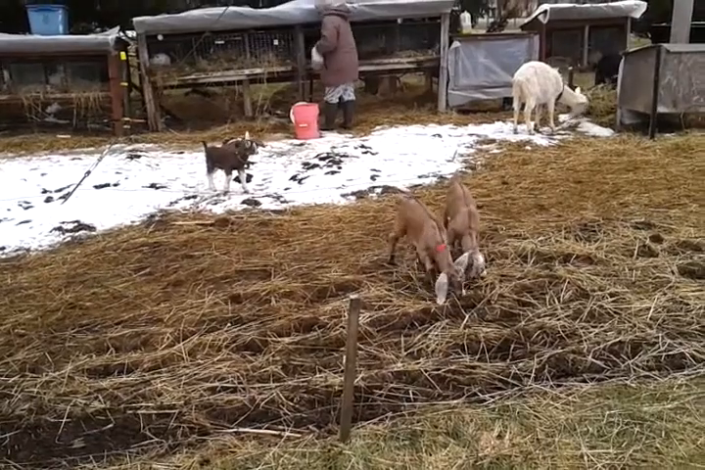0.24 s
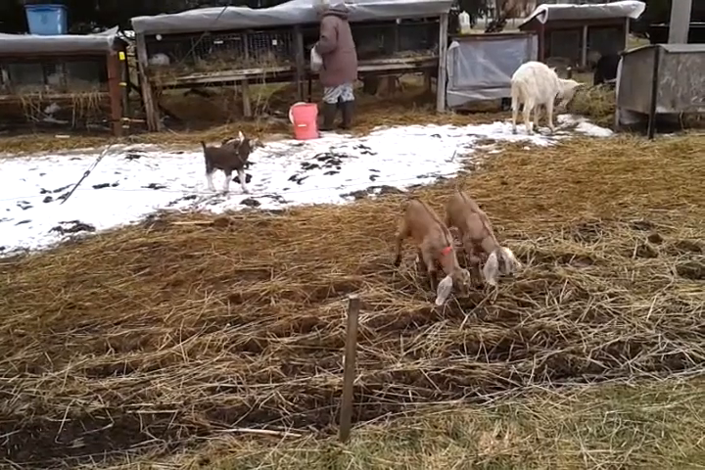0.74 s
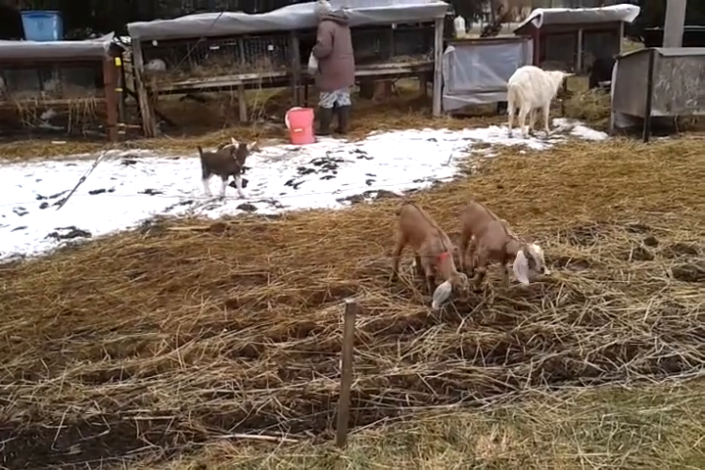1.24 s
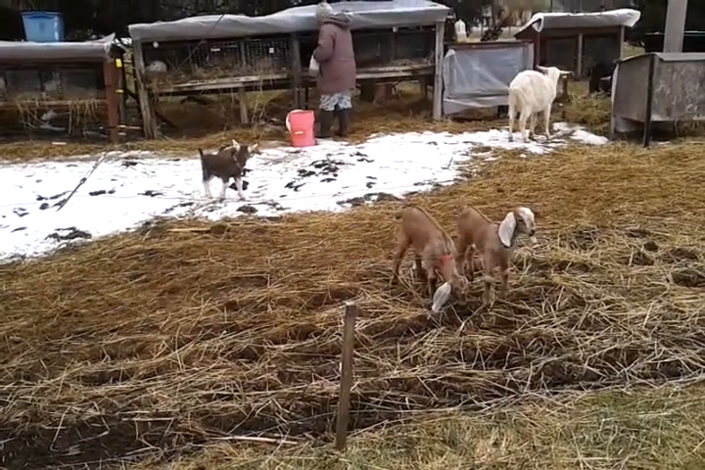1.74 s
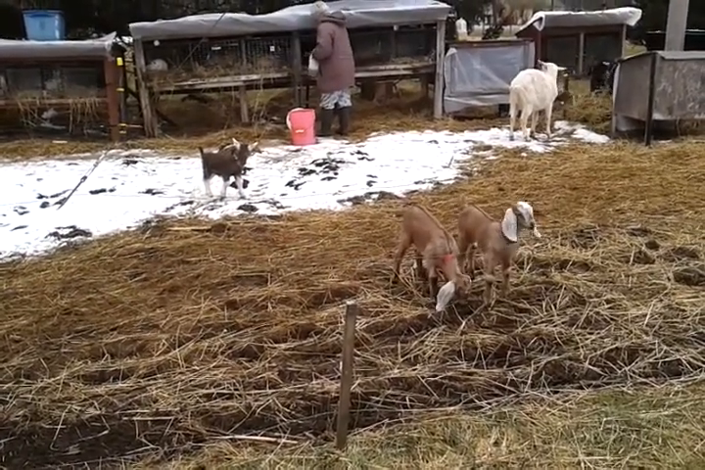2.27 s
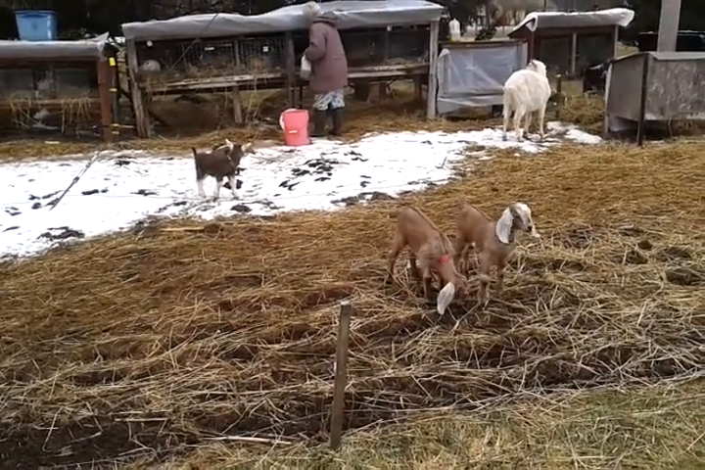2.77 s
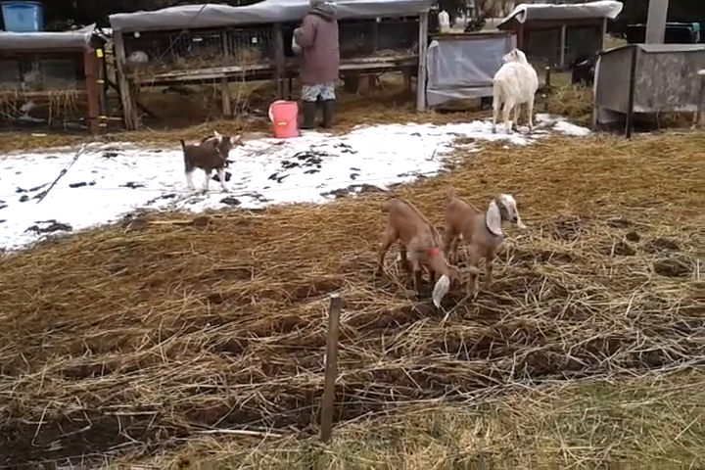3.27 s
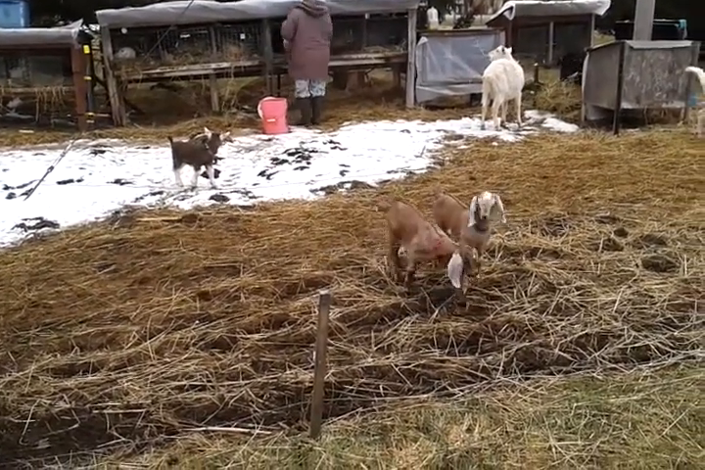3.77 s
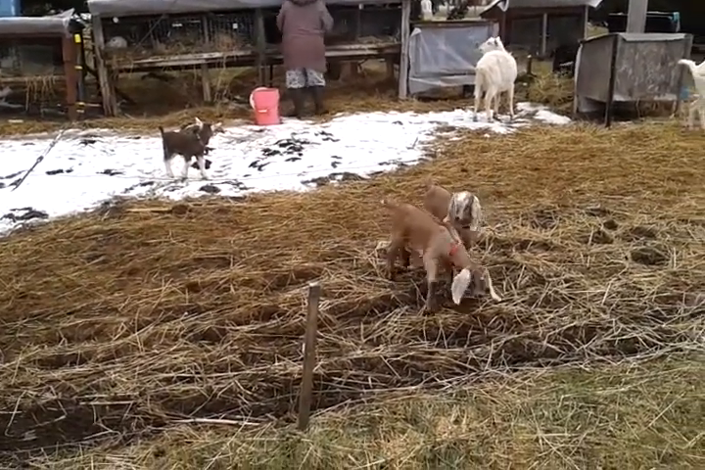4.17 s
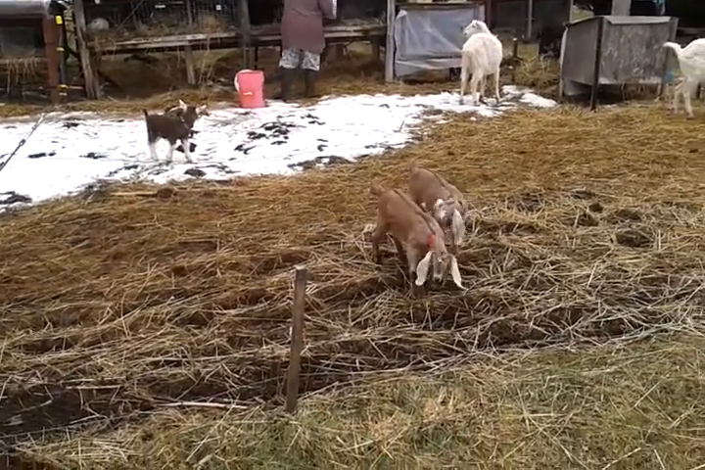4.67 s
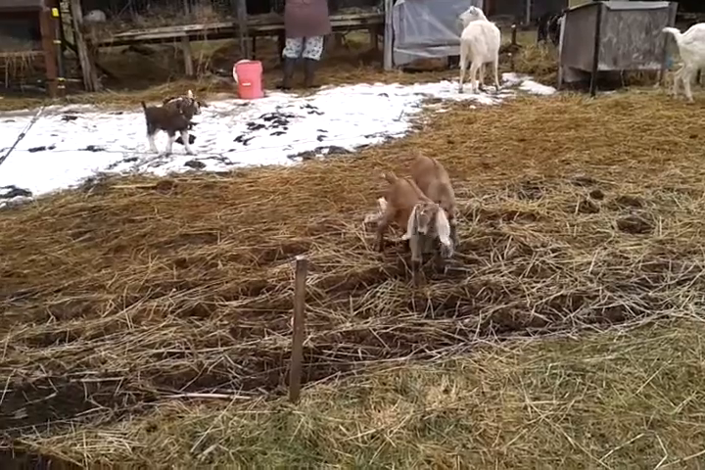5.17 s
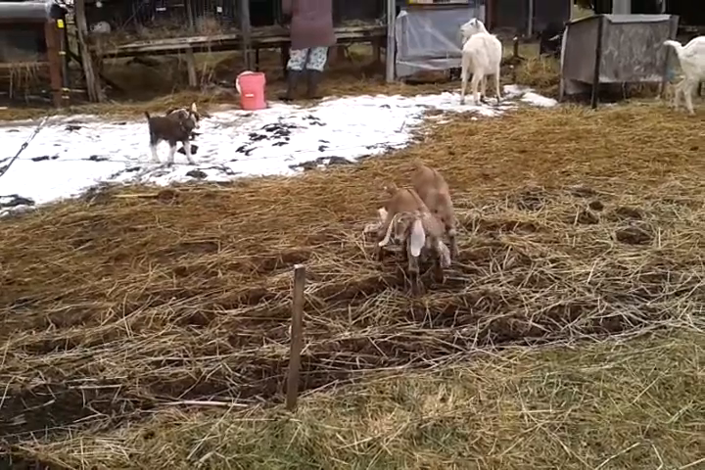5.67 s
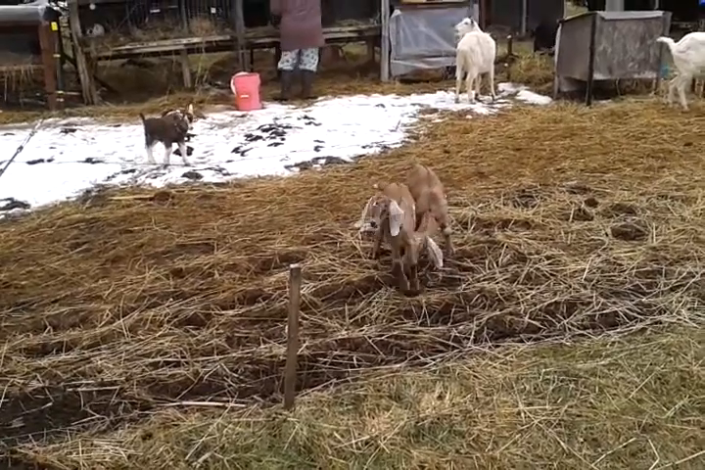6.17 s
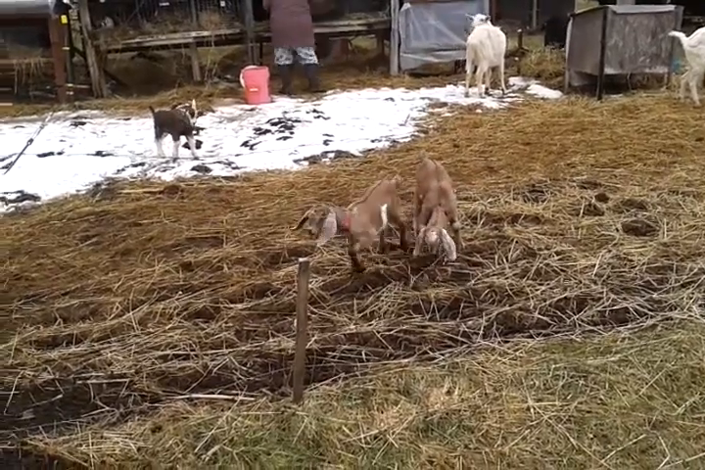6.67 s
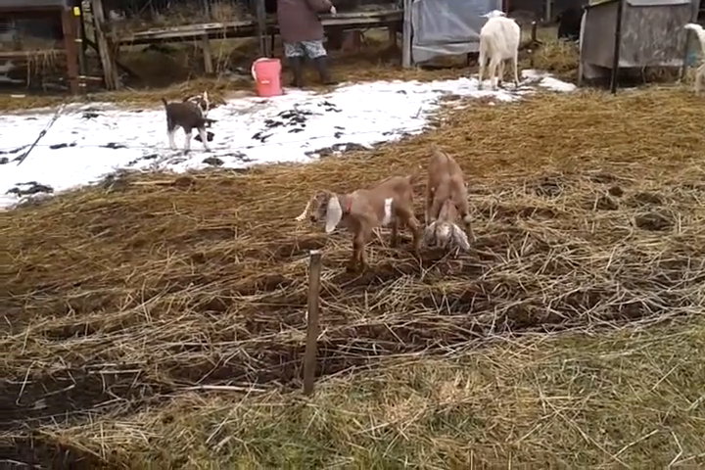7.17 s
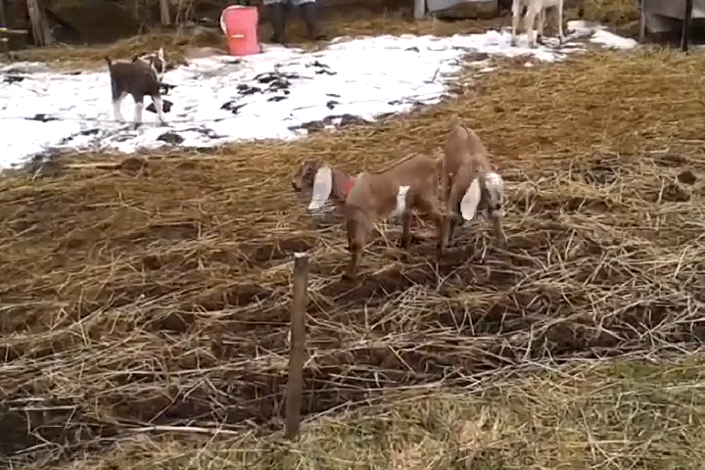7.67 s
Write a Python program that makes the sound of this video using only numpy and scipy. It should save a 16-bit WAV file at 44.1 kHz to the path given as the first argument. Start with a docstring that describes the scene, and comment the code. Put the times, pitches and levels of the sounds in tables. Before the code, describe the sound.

Soft clucks and crackling straw sit over a quiet wash of outdoor air. A low, quavering hen growl comes first, then a brief wooden clatter and a thin, high bleat from a goat kid. A rooster crows in three parts, the last overlapped by a second bleat. Close to the microphone, a plastic casing clicks and then knocks once, much louder than the animals, which sound farther off with a faint echo.

```python
"""A farmyard: hens cluck and straw rustles over a wash of open air. A long, low, rattling animal call, like
a hen's growl, quavers halfway; a throat shapes its harmonics. A loose board clatters and a kid bleats,
thin and high. Close by, a plastic casing starts to creak in dry clicks while a cockerel rasps, then crows
three syllables on two detuned membranes. The kid bleats again over the last of them, and the casing gives
one sharp knock. The sheds faintly echo the animals and the board."""
import sys
import numpy as np
from scipy import signal
from scipy.fft import rfft, irfft, next_fast_len
from scipy.io import wavfile
from scipy.ndimage import map_coordinates

SR = 44100
rng = np.random.default_rng(int(sys.argv[2]) if len(sys.argv) > 2 else 0)


def pcm_store(signal):
    """Save signal as 16-bit PCM."""
    levels = np.round(np.clip(np.atleast_2d(signal), -1, 1) * 32767)
    wavfile.write(sys.argv[1], SR, levels.astype(np.int16).T)


N = 349698


def amp(db):
    """Decibels to amplitude gain."""
    return 10 ** (np.asarray(db) / 20)


def unit(x):
    """Normalisation to rms 1."""
    return x / np.sqrt(np.mean(x ** 2) + 1e-20)


def along(points, hz):
    """Interpolation of (frequency, value) points on a log axis."""
    f, v = np.transpose(points)
    return np.interp(np.log(hz + 1), np.log(f + 1), v)


def curves(rows, t):
    """Linear interpolation of each column after the first at the times t."""
    s, *cols = np.transpose(rows)
    return [np.interp(t, s, c) for c in cols]


def add(track, s, x):
    """Superposition of x on the track from second s on."""
    start = max(round(s * SR), 0)
    track[start:start + len(x)] += x[:max(len(track) - start, 0)]


def wobble(rate, size):
    """Smooth random modulation, rate knots a second."""
    knots = rng.standard_normal(int(size * rate / SR) + 4)
    return map_coordinates(knots, [np.arange(size) * rate / SR])


def coloured(x, spectrum):
    """Linear filtering by a (frequency_hz, gain_db) spectrum, to rms 1."""
    m = next_fast_len(len(x) + 8192)
    gain = amp(along(spectrum, np.fft.rfftfreq(m, 1 / SR)))
    return unit(irfft(rfft(x, m) * gain, m)[:len(x)])


def noise(size, spectrum):
    """Filtered Gaussian noise at rms 1."""
    return coloured(rng.standard_normal(size), spectrum)


def impulse(spectrum, size=2048):
    """Minimum-phase impulse response of a body with this spectrum, peak 1."""
    cepstrum = irfft(np.log(amp(along(spectrum, np.fft.rfftfreq(size, 1 / SR))) + 1e-4))
    x = irfft(np.exp(rfft(2 * cepstrum[:size // 2], size)))
    return x / np.abs(x).max()


def held(start, end, attack, release):
    """Sample times of a call and its attack-hold-release envelope."""
    t = np.arange(start, end, 1 / SR)
    ramp = np.clip(np.minimum((t - start) / attack, (end - t) / release), 0, 1)
    return t, np.sin(np.pi / 2 * ramp) ** 2


def swell(s, db, rise, fall):
    """An envelope with exponential flanks that peaks at second s."""
    u = np.arange(N) / SR - s
    return amp(db) * np.exp(1 - np.hypot(1, 2 * u / np.where(u < 0, rise, fall)))


def strokes(rows, fall_ratio=1.67):
    """Power sum of swells that fall more slowly than they rise."""
    return np.sqrt(sum(swell(s, db, rise, fall_ratio * rise) ** 2 for s, db, rise in rows))


def voice(pitch, rough, throat, jitter, flutter_hz, count, vowel=1):
    """Source-filter model: harmonics and pulsed breath pass a throat; vowel shifts the tone's formants."""
    size, rough = len(pitch), np.clip(rough, 0, 1)
    phase = 2 * np.pi * np.cumsum(pitch * (1 + jitter * rough * wobble(flutter_hz, size))) / SR
    # the phase term k * k / 2 spreads each pulse in time
    tone = sum(amp(along(throat, k * pitch / vowel)) * np.cos(k * phase + k * k / 2)
               for k in range(1, count + 1))
    breath = coloured(rng.standard_normal(size) * (1 + np.cos(phase)) ** 2, throat)
    return np.sqrt(1 - rough ** 2) * unit(tone) + rough * breath


def note(db, hz, glide, half_s, throat, rough, count, arch=0, lean=0):
    """A gliding, arching tone under a bell-shaped envelope; lean moves the peak earlier."""
    u = np.linspace(-1, 1, round(2 * half_s * SR))
    pitch = hz * (1 + glide * u - arch * u ** 2)
    skewed = np.interp(u, [-1, -np.clip(lean, 0, .95), 1], [-1, 0, 1])
    envelope = amp(db) * np.cos(np.pi * skewed / 2) ** 3
    return envelope * voice(pitch, rough, throat, jitter=0.028, flutter_hz=185, count=count)


# spectrum of the open air: frequency_hz, gain_db
AIR_SPECTRUM = [(25, -41.5), (55, -21.5), (130, -24), (260, -21), (600, -26.5), (1000, -11.5), (1700, -14),
                (3500, -18), (6200, -21.5), (9000, -20)]
# faint low hums: peak_s, level_db, pitch_hz, half_length_s
HUMS = [(0.097, -65, 105.8, 0.42), (7.589, -70, 56.1, 0.85)]
# contour of the yard's murmur: time_s, relative_level_db
MURMUR = [(0, -65.5), (.7, -60.5), (1.8, -63.5), (2.8, -62), (3.6, -63.5), (4.8, -60), (5.5, -63.5),
          (7.8, -64.5)]


def air(wash_db=-60, murmur_gain_db=4):
    """Ambient noise: a broad wash and a low murmur drift in level beside two faint hums."""
    t = np.arange(N) / SR
    wash = amp(wash_db + 0.43 * wobble(5.3, N)) * noise(N, AIR_SPECTRUM)
    murmur = noise(N, [(30, -20.5), (70, -15), (160, -11.5), (260, -7.5), (500, -7), (1200, -10.5),
                       (3000, -48.5)])
    murmur_db = curves(MURMUR, t)[0] + murmur_gain_db + .9 * wobble(30, N)
    hums = sum(swell(s, db, half_s, half_s) * np.sin(2 * np.pi * hz * t + 0.67 * wobble(13, N))
               for s, db, hz, half_s in HUMS)
    return wash + hums + amp(murmur_db) * murmur


# reverberation time of the yard: frequency_hz, t60_s
YARD_DECAY = [(200, 0.12), (2000, 1), (7000, 0.29)]


def sheds(x):
    """Reverberation: reflections arrive after 20 ms, and each frequency decays at its own rate."""
    hz, t, bands = signal.stft(rng.standard_normal(SR // 2), SR, nperseg=256)
    tail = signal.istft(bands * amp(-60 * t / along(YARD_DECAY, hz)[:, None]), SR, nperseg=256)[1]
    return signal.fftconvolve(np.pad(x, (SR // 50, 0)), tail / np.linalg.norm(tail))[:N]


# crackling steps and brushing strokes: peak_s, level_db, rise_s
STEPS = [(.44, -53, 0.027), (.55, -51, 0.071), (1.11, -60, 0.029), (1.23, -58.5, 0.17), (1.5, -54.5, 0.095),
         (1.62, -58.5, 0.034), (2.75, -59.5, 0.074), (3.74, -62.5, 0.085), (4.38, -57, 0.051),
         (5.2, -59, 0.21), (5.58, -63, 0.07), (6.56, -52, 0.091)]
SWISHES = [(.53, -58.5, 0.047), (4.41, -57.5, 0.039), (4.65, -50, 0.1), (4.975, -54.5, 0.025),
           (5.33, -50, 0.058), (5.58, -40, 0.038), (5.69, -44, 0.075), (5.96, -45, 0.088)]
# their spectra: frequency_hz, gain_db
CRACKLE_SPECTRUM = [(600, -18.5), (2000, -7.5), (3400, -16), (4500, -8.5), (5800, -4.5), (6800, -13),
                    (9000, -30)]
SWISH_SPECTRUM = [(100, -17), (320, -16), (700, -5), (2500, -4.5), (4600, -6.5), (6500, -15), (9000, -41.5)]
# breaking stalks: start_s, relative_level_db, resonance_hz
SNAPS = [(1.644, -32.5, 6400), (2.596, -33.5, 6150), (2.632, -32.5, 6040), (3.1766, -37, 5000),
         (3.3072, -32.5, 6250), (3.959, -33, 6200), (5.554, -28.5, 5370), (5.61, -28.5, 4200),
         (6.3547, -31, 6300)]
# rubbing stalks: centre_s, level_db, pitch_hz, half_length_s
SQUEAKS = [(0.582, -48.5, 5600, 0.012), (1.093, -53, 6100, 0.01), (1.243, -48, 4950, 0.0088),
           (1.62, -53, 4540, 0.013), (5.269, -54, 5700, 0.0068)]


def straw(grazing_db=-67, snap_gain_db=-3, snap_t60_s=0.0091):
    """Friction and fracture: under hooves and muzzles, stalks crackle, snap, squeak and brush."""
    grains = rng.standard_normal(N) * amp(3.9 * wobble(500, N) + 1.3 * wobble(40, N))
    grazing = amp(grazing_db + 0.71 * wobble(12, N))
    out = np.hypot(grazing, strokes(STEPS)) * coloured(grains, CRACKLE_SPECTRUM)
    t = np.arange(SR // 30) / SR
    for s, db, hz in SNAPS:
        stalk = noise(len(t), [(hz / 10, -24), (.7 * hz, -13), (hz, 0), (hz * 2, -22)])
        add(out, s, amp(db + snap_gain_db - 60 * t / snap_t60_s) * stalk)
    for s, db, hz, half_s in SQUEAKS:
        resonance = [(hz / 2, -25), (.9 * hz, -14), (hz, 0), (1.1 * hz, -14), (2 * hz, -30)]
        add(out, s - half_s, note(db, hz, 0, half_s, resonance, rough=.8, count=1, lean=.4))
    brush = rng.standard_normal(N) * amp(1.4 * wobble(200, N))
    return out + strokes(SWISHES) * coloured(brush, SWISH_SPECTRUM)


# contacts of a loose board: start_s, peak_db, pitch_ratio
BOARD_CONTACTS = [(3.177, -47, 0.96), (3.18, -39, .8), (3.207, -43, 1.25), (3.2602, -39.5, 1.04),
                  (3.278, -39.5, 0.83), (3.29, -43.5, 1.05), (3.308, -43, 1.16), (3.3157, -41.5, 0.74)]
# its modes: frequency_hz, relative_level_db, t60_s
BOARD_MODES = [(275, -8, 0.081), (765, -8.5, 0.045), (993, -0.5, 0.084), (1150, -3, 0.033),
               (1840, -8, 0.0218), (2800, -12, 0.026)]


def board(crack_db=-7, crack_t60_s=0.013):
    """Modal vibration: each rebound of a board cracks and excites its damped modes in a new balance."""
    out, t = np.zeros(N), np.arange(SR // 10) / SR
    for s, db, ratio in BOARD_CONTACTS:
        ring = sum(amp(level + rng.normal(0, 3.7) - 60 * t / t60)
                   * np.sin(2 * np.pi * (hz * ratio * t + rng.random()))
                   for hz, level, t60 in BOARD_MODES)
        crack = noise(len(t), [(80, -21), (400, -8), (2500, -3), (6000, -15)])
        crack *= amp(crack_db - 60 * t / crack_t60_s)
        add(out, s, amp(db) * (ring / np.abs(ring).max() + crack))
    return out


# clucks: centre_s, level_db, pitch_hz, half_length_s, glide_ratio
CLUCKS = [(.305, -51, 215, .024, .05), (.433, -50, 490, .035, .05), (.605, -54, 245, .025, .05),
          (1.052, -48, 250, .028, .2), (1.17, -52.5, 322, .075, -.04), (1.275, -54, 280, .045, .08),
          (1.703, -47.5, 325, .016, .05), (2.092, -47, 205, .02, .05), (2.594, -44, 215, .016, -.15),
          (2.942, -44, 214, .036, .07), (3.53, -56, 360, .05, -.05), (3.647, -53.5, 290, .032, .08),
          (3.88, -55, 400, .04, .15), (4.025, -52, 275, .04, .12), (4.89, -51, 470, .022, .03),
          (7.202, -48, 255, .026, -.22), (7.317, -49, 232, .02, .03)]
# a hen's formants: frequency_hz, gain_db
HEN_THROAT = [(200, -12), (290, -0.5), (430, 4.5), (650, 7.5), (880, 2.5), (1100, -13.5), (1600, -17),
              (2700, -15.5), (3500, -51.5)]
# thin peeps: centre_s, level_db, pitch_hz, glide_ratio, half_length_s
PEEPS = [(0.169, -61, 1230, -0.038, 0.03), (7.826, -51, 1170, -0.043, 0.032)]


def hens(croons=22, croon_db=-61.5, croon_hz=390):
    """Formant filtering of short glides: clucks, falling peeps and the croons of the flock farther off."""
    out = np.zeros(N)
    peep_throat = [(700, -27), (1200, 2), (3600, -12), (6000, -30)]
    croon_throat = [(300, -3), (600, -2), (1150, 0), (1500, -12), (3000, -22)]
    for s, db, hz, half_s, glide in CLUCKS:
        add(out, s - half_s, note(db, hz, glide, half_s, HEN_THROAT, rough=.22, count=14, lean=.55))
    for s, db, hz, glide, half_s in PEEPS:
        add(out, s - half_s, note(db, hz, glide, half_s, peep_throat, rough=.3, count=3))
    for k, (when, high, bend, span) in enumerate(rng.uniform(-1, 1, (croons, 4))):
        hz, half_s = croon_hz * 1.4 ** high, .07 + .03 * span
        croon = note(croon_db, hz, .08 * bend, half_s, croon_throat, rough=.15, count=6)
        add(out, (k + when / 2) * N / SR / croons, croon)
    return out


# modes of the casing's hollow grip: frequency_hz, relative_level_db, t60_s
GRIP_MODES = [(264, 1.5, 0.1), (386, 17, 0.036), (670, 9, 0.041), (1180, -11.5, 0.0047)]


def thud(t, ratio):
    """Damped resonance: a bump rings the grip's modes, scaled by ratio and randomly detuned."""
    ring = sum(amp(db + rng.normal(0, 2.3) - 60 * t / t60)
               * np.cos(2 * np.pi * hz * ratio * rng.normal(1, 0.1) * t) for hz, db, t60 in GRIP_MODES)
    return ring / np.abs(ring).max() * (1 - np.exp(-t / 0.000067))


# clicks of the casing: start_s, peak_db, relative_thud_db
CLICKS = [(4.438, -40, -17), (4.945, -31, -15), (6.1614, -27, -16), (6.1728, -28.5, -3.5), (6.208, -23, -9),
          (6.239, -19.5, -9), (6.2494, -20.5, -10), (6.284, -27.5, 1), (6.3543, -22, -17), (7.091, -32, -2)]
# soft bumps of the grip: start_s, peak_db, pitch_ratio
BUMPS = [(4.44, -39, 2.1), (4.945, -36.5, 2.6), (5.571, -33, 0.53), (5.61, -35.5, 0.7), (5.963, -35, 0.97),
         (7.073, -28.5, 1.04), (7.088, -38, 0.8), (7.116, -34.5, 0.99)]
# dull rubs of the grip: peak_s, level_db, rise_s
RUBS = [(6.3, -53, 0.049), (6.97, -53, 0.05)]
# spectra of a click, the knock and a rub: frequency_hz, gain_db
CLICK_SPECTRUM = [(300, -46), (700, -1.5), (1150, 3.5), (2200, 0), (2770, -2), (3300, 1.5), (4200, 1.5),
                  (5150, -3.5), (6000, -35), (8000, -64)]
KNOCK_SPECTRUM = [(60, -37), (250, -3.5), (600, -3.5), (900, 8), (1250, 2), (2100, 9), (2400, -2.5),
                  (2800, -20), (3500, -0.5), (5400, -2.5), (6100, -2.5), (6700, -24), (8500, -17)]
RUB_SPECTRUM = [(130, -21.5), (280, -3), (560, -5.5), (1300, -28)]


def casing(thud_gain_db=-5, scrape_db=-8, scrape_t60_s=0.013, knock_s=7.0444, knock_db=-6):
    """Impulse response of a plastic shell: dry clicks and one knock, over the grip's ring and rub."""
    out, t = np.zeros(N), np.arange(SR // 16) / SR
    click = impulse(CLICK_SPECTRUM)
    for s, db, thud_db in CLICKS:
        scrape = amp(scrape_db - 60 * t / scrape_t60_s) * np.tanh(noise(len(t), CLICK_SPECTRUM))
        add(out, s, amp(db) * click)
        add(out, s, amp(db) * (scrape + amp(thud_db + thud_gain_db) * thud(t, 0.726)))
    for s, db, ratio in BUMPS:
        add(out, s, amp(db) * thud(t, ratio))
    add(out, knock_s, amp(knock_db) * impulse(KNOCK_SPECTRUM))
    return out + strokes(RUBS) * noise(N, RUB_SPECTRUM)


# toneless rasps before the crow: peak_s, level_db, rise_s, fall_s, gape_ratio
RASPS = [(4.675, -52, 0.05, 0.081, 1.5), (4.98, -52.5, 0.051, 0.047, 1.8), (5.13, -40, 0.03, 0.063, 0.066),
         (5.236, -40, 0.03, 0.021, 1.2)]
# their spectra with the beak shut and open: frequency_hz, gain_db
BEAK_SHUT = [(250, -17), (650, -6), (1050, -4.5), (1350, 4.5), (1750, -4), (2400, -14.5), (3400, -22.5),
             (4700, -13.5), (5800, -26.5)]
BEAK_OPEN = [(1200, -20.5), (2000, 1.5), (2500, 4), (2900, -6), (3400, -20)]


def rasps():
    """Turbulence: air is chopped unevenly in the cockerel's throat, brighter when the beak gapes."""
    airflow = amp(2 * wobble(330, N)) * rng.standard_normal(N)
    shut, wide = coloured(airflow, BEAK_SHUT), coloured(airflow, BEAK_OPEN)
    return sum(swell(s, db, rise, fall) * (shut + gape * wide) / np.hypot(1, gape)
               for s, db, rise, fall, gape in RASPS)


# the cockerel's formants: frequency_hz, gain_db
CROW_THROAT = [(600, -24), (850, -10), (1020, -0.5), (1400, -16), (1570, -8), (1700, -2), (1900, 2),
               (2080, -1), (2250, -6), (2390, -2), (2580, -5.5), (2780, -8.5), (3100, -7), (3450, -17),
               (5000, -37.5)]


def membrane(pitch, free, waver=.014, waver_hz=110, flicker_db=4.2):
    """Period doubling: swinging free, one side of the voice box wavers and adds half-order partials."""
    size = len(pitch)
    pitch = pitch * (1 + free * waver * (wobble(waver_hz, size) + wobble(500, size)))
    phase = 2 * np.pi * (np.cumsum(pitch) / SR + rng.random())

    def partial(k):
        level_db = along(CROW_THROAT, k * pitch) + free * flicker_db * wobble(waver_hz, size)
        return amp(level_db) * np.cos(k * phase)
    return sum(partial(k) for k in (1, 2, 3)) + free * (partial(1.5) + partial(2.5))


# voiced syllables: start_s, end_s, pitch_hz, fundamental_db, overtones_db, fade_db_per_s, release_s,
# fall_ratio, beak_cutoff_hz, final_gape_ratio
SYLLABLES = [(5.281, 5.398, 975, -52, -40, 8, 0.039, 0.01, 2450, 0.34),
             (5.551, 5.996, 1002, -45.5, -38, 3, 0.015, 0.01, 3250, 0.5),
             (6.251, 6.829, 991.5, -43.5, -36.5, 13, .11, 0.22, 3080, 0.034)]
# moments of locking: centre_s, half_length_s, depth_ratio, pitch_hz, fundamental_gain_db, overtone_gain_db
LOCKS = [(5.318, .01, .5, 1060, 6, 1), (5.362, .01, .5, 1055, 5, 0), (5.593, .018, .7, 1010, 4, -1),
         (5.742, .024, .55, 935, -3, 0), (5.975, .02, .85, 932, -4, 1), (6.492, .036, 1, 982, 8, -11),
         (6.748, .05, .65, 985, 3, 0)]
# upper resonances of the screech: frequency_hz, gain_db
HISS_SPECTRUM = [(3300, -22.5), (4100, -0.5), (4550, 3), (5100, -9), (5650, -20.5), (6250, -9), (6900, -24)]


def crow(split=.042, breath=.56, hiss_db=-57.5, quaver_hz=22, bend=.011, throb_db=.9, fall_s=.065):
    """Mode locking: the cockerel's two detuned membranes screech, merging into one note at set moments."""
    out = np.zeros(N)
    lock_s, lock_half_s, depth, lock_hz, lock_base_db, lock_over_db = np.transpose(LOCKS)
    for start, end, hz, base_db, over_db, fade_rate, release, fall, top_hz, gape in SYLLABLES:
        t, gate = held(start, end, attack=.028, release=release)
        size = len(t)
        locking = np.exp(-((t[:, None] - lock_s) / lock_half_s) ** 4)
        free = np.clip(1 - locking @ depth, 0, 1)
        quaver = free * wobble(quaver_hz, size)
        droop = 1 - fall * np.clip((t - end + release) / fall_s, 0, 1)
        pitch = (hz + locking @ (depth * (lock_hz - hz))) * (1 + bend * quaver) * droop
        low = membrane(pitch * (1 - split * free), free)
        high = membrane(pitch * (1 + split * free), free)
        screech = unit((low + free * high) / np.hypot(1, free)) + breath * free * noise(size, CROW_THROAT)
        screech /= np.sqrt(1 + np.abs(signal.hilbert(screech)) ** 2 / 2)  # the swing saturates
        base = coloured(screech * (1 + 0.44 * free * wobble(420, size)),  # sidebands split the low tone
                        [(550, -19), (800, -4), (1100, -5.5), (1350, 0), (1650, -19)])
        overtones = coloured(screech, [(1200, -35), (1550, -3), (1850, 0), (top_hz, 0),
                                       (1.04 * top_hz, -14), (2 * top_hz, -30)])
        opening = gape * ((t - start) / (end - start)) ** 2  # the opening beak brightens the syllable
        bright = coloured(overtones, [(2150, -21), (2550, 6), (3200, -5)])
        overtones = (overtones + opening * bright) / np.hypot(1, opening)
        loss_db = fade_rate * (t - start)
        sputter = screech * rng.standard_normal(size) * amp(3.6 * wobble(150, size))
        hiss = amp(hiss_db - loss_db) * free * coloured(sputter, HISS_SPECTRUM)
        base *= amp(base_db + locking @ lock_base_db)
        overtones *= amp(over_db - loss_db + locking ** 2 @ lock_over_db)
        add(out, start, gate * amp(throb_db * quaver) * (base + overtones + hiss))
    return out


# two bleats of three pulses: centre_s, level_db, pitch_hz, glide_ratio, arch_ratio, half_length_s
KID_PULSES = [(4.021, -52.5, 529, 0.023, 0.0034, 0.054), (4.138, -48, 521.5, -0.012, 0.02, 0.056),
              (4.282, -50, 487, -0.012, 0.046, 0.059), (6.482, -42, 537, 0.0052, -0.04, 0.044),
              (6.587, -39.5, 512, -.015, .04, .055), (6.725, -40, 505.4, 0.08, .12, 0.054)]
# the kid's formants: frequency_hz, gain_db
KID_THROAT = [(500, -14), (1000, -3), (1550, -4.5), (2100, 0), (2600, -7.5), (3100, -10.5), (3600, -16),
              (4200, 4.5), (5000, 4.5), (6000, 9), (6700, 4), (7300, -7.5), (8000, -16)]


def kid(reference_db=-42, dull_db_per_db=1.05, scatter_db=3.5):
    """Spectral tilt: each thin pulse has its own colour, and softer ones are duller and hoarser."""
    out = np.zeros(N)
    for s, db, hz, glide, arch, half_s in KID_PULSES:
        low_gain_db = dull_db_per_db * (reference_db - db)
        throat = [(f, gain + rng.normal(0, scatter_db) + low_gain_db * (f < 3000))
                  for f, gain in KID_THROAT]
        rough = np.interp(db, [-52, -42], [.34, .16])
        add(out, s - half_s, note(db, hz, glide, half_s, throat, rough, count=15, arch=arch))
    return out


# pushes of the quaver: start_s, end_s, level_db, pitch_hz, glide_ratio, level_change_db, vowel_ratio
PUSHES = [(1.709, 1.793, -42, 178, -0.18, -8.5, 1.13), (1.843, 1.922, -44, 186.2, -.24, -6, 1.13),
          (2.003, 2.062, -48, 195, -0.19, 0, 1.08), (2.12, 2.187, -47.5, 167.2, 0.16, 1, 0.93),
          (2.225, 2.346, -51.5, 205.4, -0.22, -2, 1.04)]
# their formants: frequency_hz, gain_db
PUSH_THROAT = [(170, -37), (350, -22), (520, 2), (700, 8), (900, 1), (1100, -9.5), (1450, -28.5),
               (3000, -23.5), (4000, -70)]


def growl_quaver():
    """Frequency modulation: in five pushes halfway through the growl, pitch and formants glide together."""
    out = np.zeros(N)
    for start, end, db, hz, glide, change_db, vowel in PUSHES:
        t, gate = held(start, end, attack=.0071, release=.017)
        progress = (t - start) / (end - start)
        bend = 1 + glide * progress
        push = voice(hz * bend, .18, PUSH_THROAT, jitter=.09, flutter_hz=110, count=20, vowel=vowel * bend)
        add(out, start, amp(db + change_db * progress) * gate * push)
    return out


# the growl's moving upper resonance: time_s, frequency_hz, level_db
RESONANCE_PATH = [(1.92, 1955, -60), (2.0, 2000, -58), (2.1, 2248, -76), (2.24, 2750, -64),
                  (2.3, 2723, -82), (2.34, 2552, -61), (2.42, 2450, -66.5), (2.58, 2800, -63.5),
                  (2.72, 2380, -62)]


def growl_resonance(end_s):
    """Narrow-band resonance: a thin band of noise follows the growl's gliding upper formant."""
    out = np.zeros(N)
    t, gate = held(RESONANCE_PATH[0][0], end_s, attack=.014, release=.014)
    hz, db = curves(RESONANCE_PATH, t)
    ring = noise(len(t), [(70, 7), (160, -4), (500, -18.5)]) * np.cos(2 * np.pi * np.cumsum(hz) / SR)
    add(out, t[0], gate * amp(db) * unit(ring))
    return out


# the long growl: time_s, pitch_hz, mouth_opening_ratio, level_db
GROWL_PATH = [(1.2, 156.9, .05, -49.5), (1.36, 150.7, 0, -49), (1.45, 160.1, .35, -49.5),
              (1.65, 164.8, 0.08, -48.5), (1.75, 160.2, 0.1, -49.5), (1.83, 171.1, 0, -51.5),
              (1.96, 145.8, 1, -54), (2.2, 159.9, 1, -55), (2.36, 154.1, .8, -51.5),
              (2.5, 159.4, 0.7, -48.5), (2.8, 149.2, 0.17, -47.5)]
# the voice roughens once it has broken: time_s, roughness_ratio
ROUGHNESS = [(1.7, .33), (2.0, .38), (2.8, .48)]
# the growl's formants: frequency_hz, gain_db
GROWL_THROAT = [(150, -41), (330, -10), (490, 11), (640, 3), (800, -15), (1100, -16.5), (1500, -12.5),
                (2400, -24), (3500, -55)]


def growl(start_s=1.185, end_s=2.8, rattle_hz=26, spread_hz=15, dip_db_per_roughness=-17):
    """Source-filter voicing: the opening mouth lifts a low call's vowel; throat catches make it rattle."""
    out = np.zeros(N)
    t, gate = held(start_s, end_s, attack=.013, release=.014)
    pitch, opening, level_db = curves(GROWL_PATH, t)
    rough, = curves(ROUGHNESS, t)
    pitch *= 1 + 0.0154 * wobble(24.95, len(t))
    closed = voice(pitch, rough, GROWL_THROAT, jitter=0.1006, flutter_hz=88.7, count=14)
    wide = coloured(closed, [(520, -22), (750, 11), (1150, 4.5), (1700, -15)])
    call = (closed + opening * wide) / np.hypot(1, opening)
    catch_hz = rattle_hz + spread_hz * wobble(rattle_hz, len(t))
    catches = np.sin(np.pi * np.cumsum(catch_hz) / SR) ** 4
    call *= amp(dip_db_per_roughness * rough * catches)
    add(out, start_s, amp(level_db) * gate * unit(call))
    return out + growl_quaver() + growl_resonance(end_s)


def scene(echo_db=-17, kid_echo_db=-13):
    """Superposition: animals and board with their echo, plus straw, the close casing and the air."""
    yard = growl() + rasps() + crow() + hens() + board()
    young = kid()
    echo = sheds(amp(echo_db) * yard + amp(kid_echo_db) * young)
    return (yard + young + echo + straw() + casing() + air())[None]


def record(dry):
    """Band limiting: deep bass and treble roll off, with a steep cut above 7900 Hz."""
    m = next_fast_len(N + 8192)
    hz = np.fft.rfftfreq(m, 1 / SR)
    gain = amp(along([(20, -15), (50, 0), (6400, 0), (7200, -4), (7900, -14)], hz))
    gain /= 1 + (hz / 7900) ** 40
    return irfft(rfft(dry, m) * gain, m)[..., :N]


dry = scene()
out = record(dry)
pcm_store(out)
```